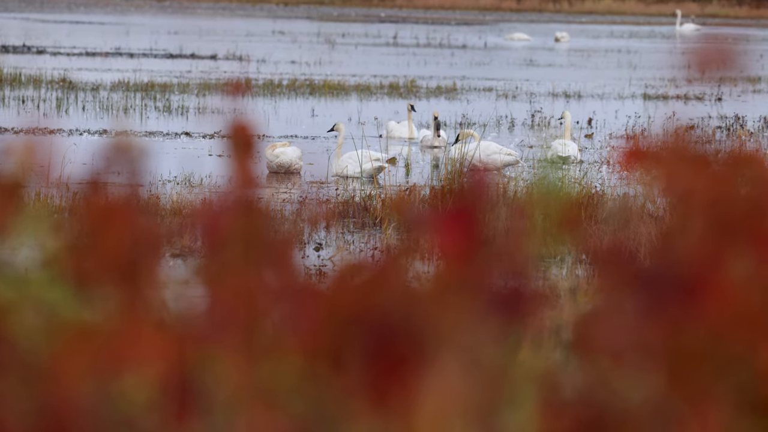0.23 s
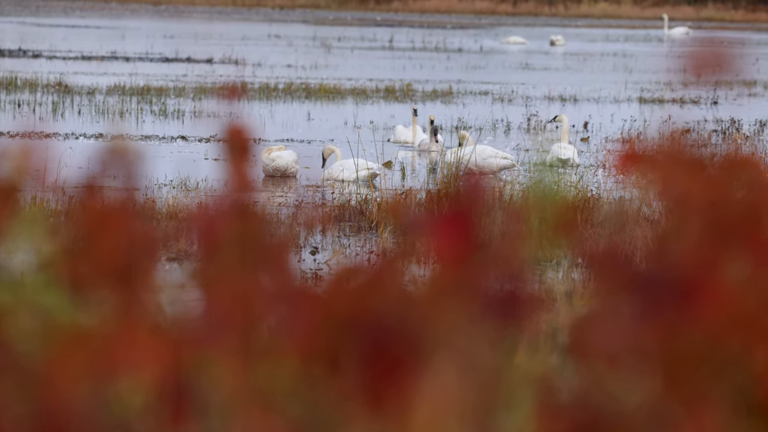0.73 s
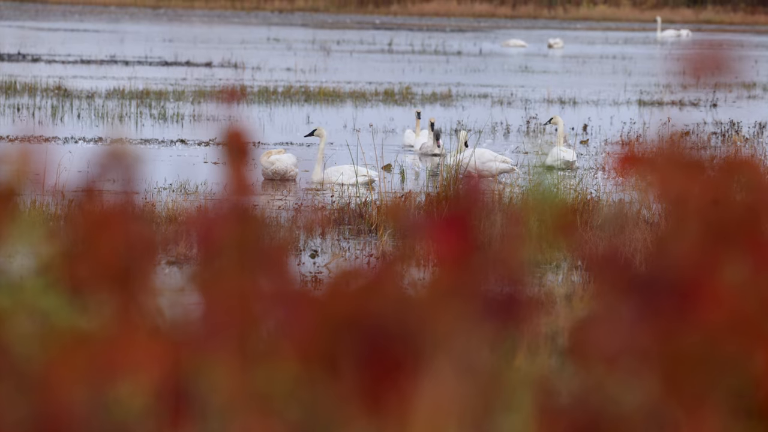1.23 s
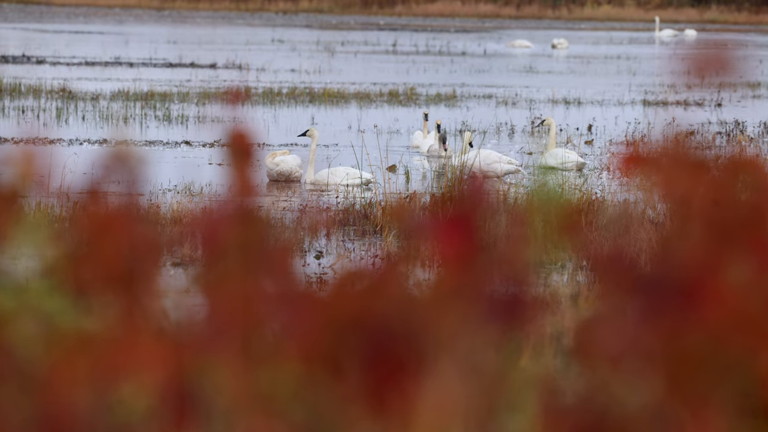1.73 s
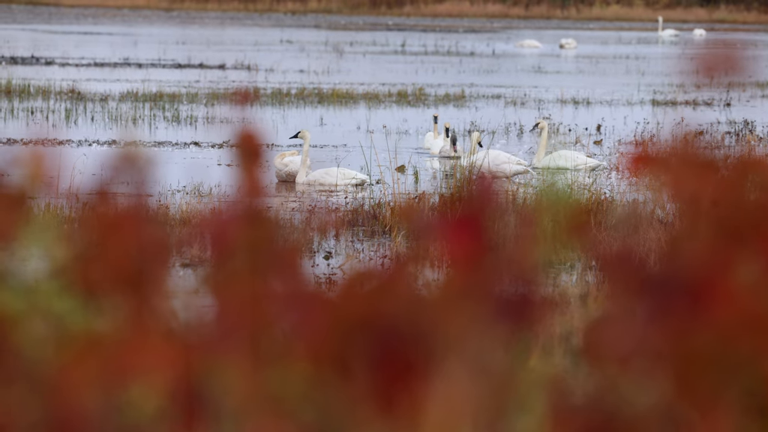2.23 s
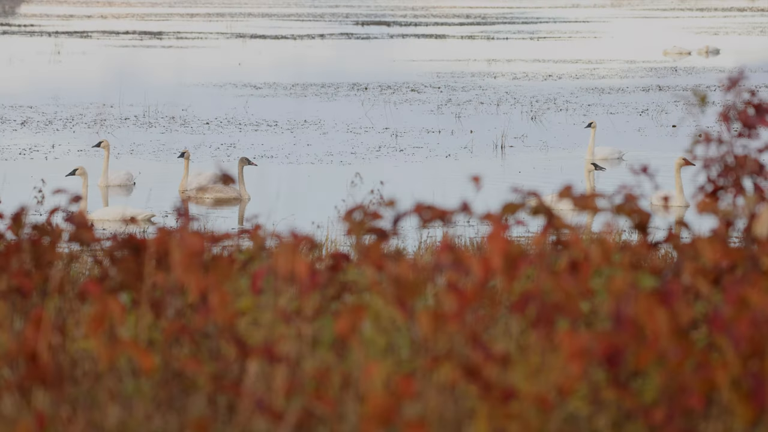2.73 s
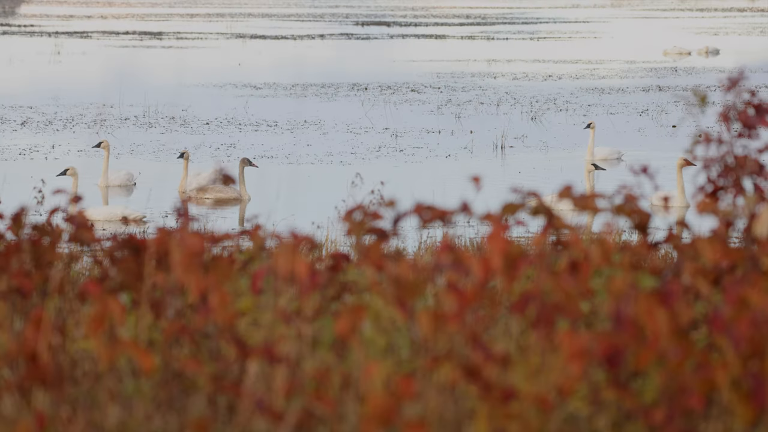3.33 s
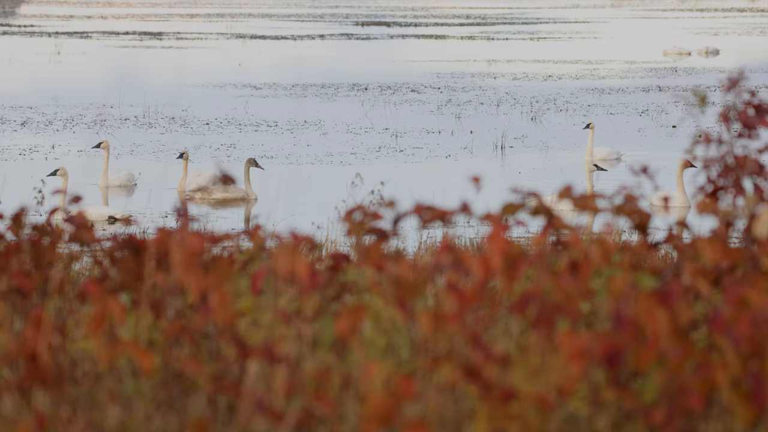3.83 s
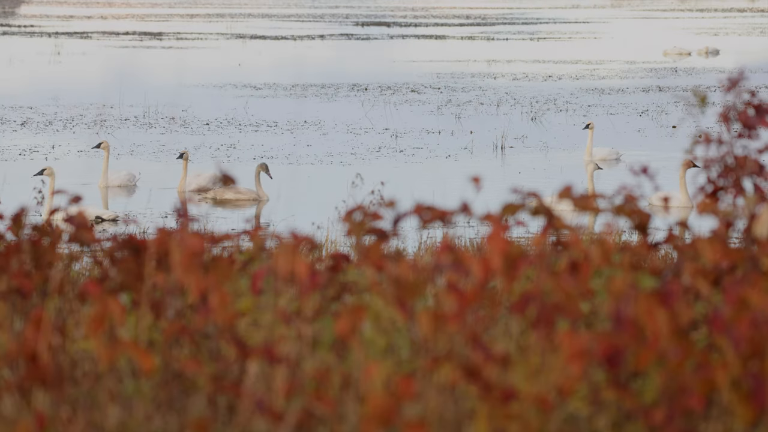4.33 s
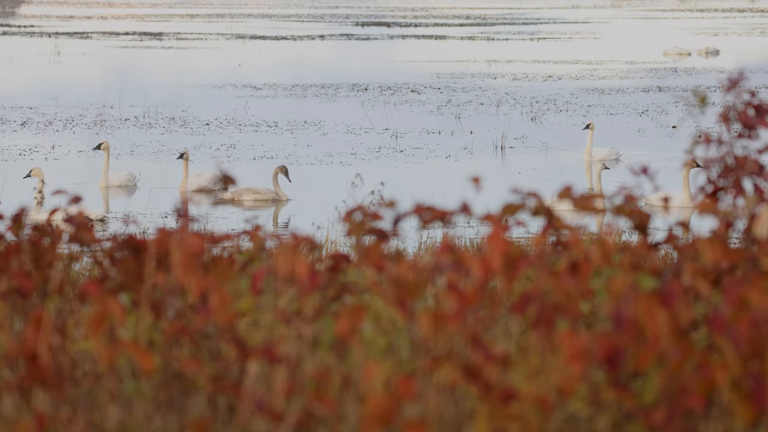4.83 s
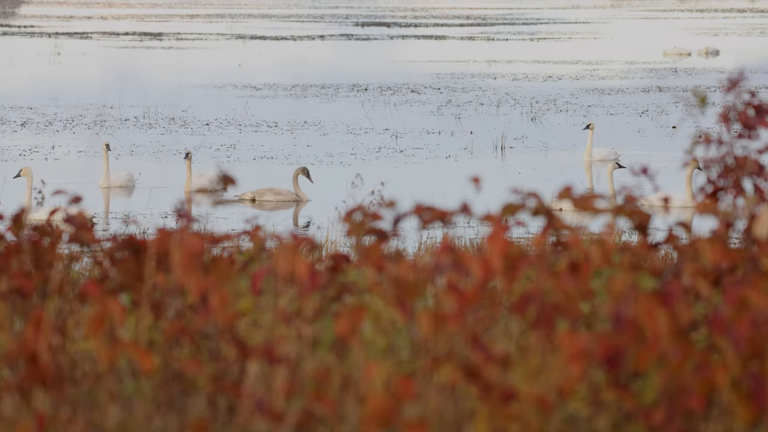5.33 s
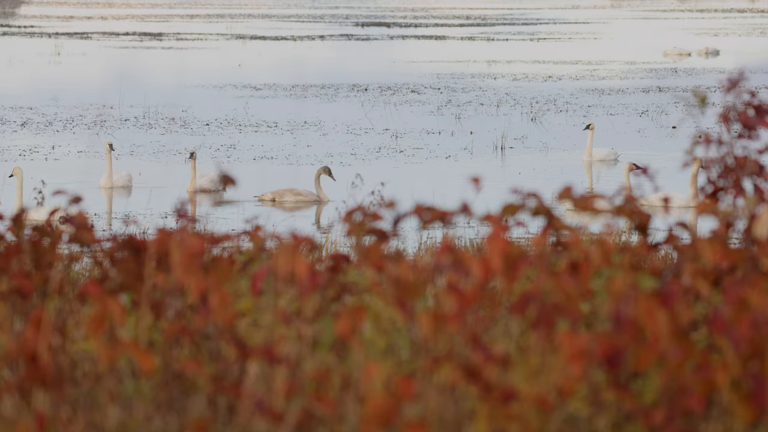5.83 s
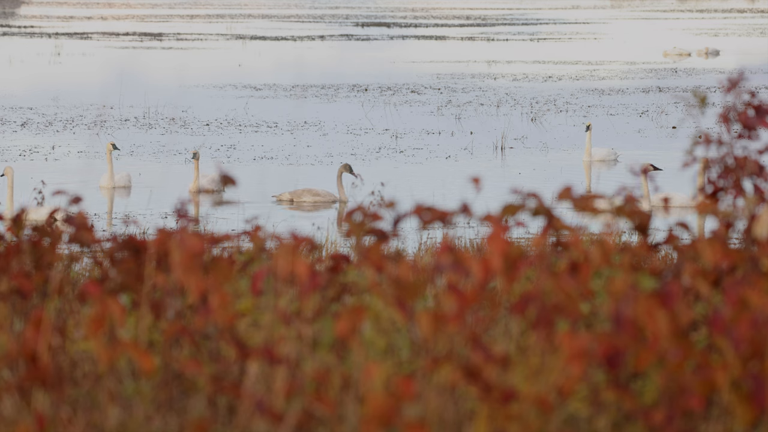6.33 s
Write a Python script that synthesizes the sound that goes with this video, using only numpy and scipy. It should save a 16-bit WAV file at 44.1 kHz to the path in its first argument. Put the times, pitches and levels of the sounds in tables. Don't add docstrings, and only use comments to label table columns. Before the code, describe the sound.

Distant swans hoot and bugle over a marshy pond, sparse at first amid low wind buffeting, later overlapping loudly with faint shore echoes.

```python
import sys
import numpy as np
from scipy import signal
from scipy.fft import rfft, irfft, next_fast_len
from scipy.io import wavfile
from scipy.ndimage import uniform_filter1d, map_coordinates

SR = 44100
rng = np.random.default_rng(int(sys.argv[2]) if len(sys.argv) > 2 else 0)


def voltage_ratio(level):
    return 10 ** (np.asarray(level, float) / 20)


def file_out(sig):
    cols = np.atleast_2d(sig).T
    lim = np.clip(cols, -1, 1)
    pcm = np.round(lim * 32767).astype(np.int16)
    wavfile.write(sys.argv[1], SR, pcm)


N = 290178
TIME = np.arange(N) / SR
CHANGE_S = 2.447

# (frequency [Hz], likeness [0-1])
FIRST_ALIKE = [(60, 1), (130, 0.9), (290, 0.97), (640, 0.99), (1410, 1), (3100, 0.93), (6820, 0.66),
               (15000, 0.18)]


def unit(x):
    return x / np.sqrt(np.mean(x ** 2) + 1e-20)


def along(points, hz):
    f, v = np.transpose(points)
    return np.interp(np.log(hz + 1), np.log(f + 1), v)


def wobble(rate, size):
    knots = rng.standard_normal(max(int(size * rate / SR) + 4, 200))
    return map_coordinates(knots, [np.arange(size) * rate / SR])


def filtered(x, response):
    m = next_fast_len(x.shape[-1] + 8192)
    spectrum = rfft(x, m) * response(np.fft.rfftfreq(m, 1 / SR))
    return irfft(spectrum, m)[..., :x.shape[-1]]


def rush(spectrum, alike, patchy_db):
    z = signal.stft(rng.standard_normal((2, N)), nperseg=512)[2]
    field = uniform_filter1d(rng.standard_normal(z.shape[1:]), 6, 0)
    field = unit(uniform_filter1d(field, 14, 1))
    pair = signal.istft(z * voltage_ratio(patchy_db * field), nperseg=512)[1][:, :N]

    def mid_and_side(hz):
        angle = np.arccos(np.clip(along(alike, hz), -1, 1)) / 2
        return voltage_ratio(along(spectrum, hz)) * [np.cos(angle), np.sin(angle)]

    mid, side = filtered(pair, mid_and_side)
    return unit(np.array([mid + side, mid - side]))


def wind():
    # (time [s], level [dB])
    buffet = [
        (0.0, -56),
        (0.13, -48),
        (2.13, -47.5),
        (2.45, -49.5),
    ]
    # (frequency [Hz], density [dB per Hz])
    gust = [(12, -48), (20, -4.5), (76, 0), (130, -12.5), (190, -37.5), (239, -21), (350, -33.5),
            (460, -83), (770, -120)]
    lumps = voltage_ratio(2.5 * wobble(22.01, N))
    level_db = np.interp(TIME, *np.transpose(buffet))
    return voltage_ratio(level_db) * unit(lumps * rush(gust, FIRST_ALIKE, patchy_db=-2.0))


def first_marsh():
    # (frequency [Hz], density [dB per Hz])
    first_colour = [(88, -73), (150, -7), (244, -6.5), (347, -7), (397, 1), (610, -11), (686, -4),
                    (801, -11.5), (993, -5), (1230, -15.5), (1650, -15), (2040, -18.5), (3590, -18.5),
                    (5200, -24), (15800, -26.5)]
    level_db = -53 + 0.8 * wobble(5, N)
    return voltage_ratio(level_db) * rush(first_colour, FIRST_ALIKE, patchy_db=1.0)


def twigs():
    # (time [s], peak level [dB], ring frequency [Hz])
    ticks = [(0.13, -47, 1660), (0.254, -46, 1730), (0.7018, -41.5, 4100), (0.8619, -43, 2100),
             (1.143, -50.5, 3210), (1.2321, -41, 3400), (1.3144, -34, 3930), (1.671, -48.5, 3200),
             (1.719, -49.5, 2940), (1.898, -46.5, 3040), (2.097, -48, 1630), (2.37, -29, 1460),
             (3.5067, -42, 1800), (4.247, -48, 5270)]
    out, t = np.zeros(N), np.arange(900) / SR
    for s, db, hz in ticks:
        snap = np.sin(2 * np.pi * 4200 * t) * voltage_ratio(-60 * t / 0.0009)
        ring = np.sin(2 * np.pi * hz * t) * voltage_ratio(-60 * t / 0.0022)
        wisp = 0.14 * rng.standard_normal(len(t)) * voltage_ratio(-60 * t / 0.012)
        out[round((s + 0.0012) * SR):][:len(t)] += voltage_ratio(db + 9.5) * (snap + 0.9 * ring + wisp)
    return filtered(out, lambda f: 1 / (1 + (f / 6500) ** 6) / (1 + (1000 / (f + 1)) ** 4))


def breath(t, length, change_db, manner):
    attack, release, dome_db, crest, arch, scoop, sag, dull, dying_db = manner
    broken_share = 0.41
    off_crest = (2 * (t / length - crest)) ** 2
    opening = np.clip(1 - t / attack, 0, 1)
    closing = np.clip(1 - (length - t) / release, 0, 1)
    broken = np.clip(closing * release / 0.022, 0, 1) ** 0.92
    pitch_share = 1 - arch * off_crest - scoop * np.exp(-t / 0.012) - sag * broken
    dying = broken_share * broken + (1 - broken_share) * closing ** 2
    db = change_db * (t / length - 0.5) - dome_db * off_crest - 16 * opening + dying_db * dying
    bright_db = -7 * opening - 4 * broken - dull * off_crest
    return [uniform_filter1d(c, size=300, mode="nearest") for c in (pitch_share, db, bright_db)]


def overtones(pitch_hz, voice, bright_db, lag):
    numbers = [1, 2, 3, 4, 5, 6, 7, 8, 9, 10, 12, 15, 20, 28]
    k = np.arange(1, 37)[:, None]
    last = numbers[len(voice) - 1]
    level_db = np.interp(k, numbers[:len(voice)], voice)
    level_db = level_db - 34 * np.log2(np.maximum(k / last, 1))
    level_db = level_db + bright_db * np.log2(np.maximum(k / 2, 1))
    drift = rng.uniform(0, 2 * np.pi) + 1.5 * wobble(14, len(pitch_hz))
    ripple = np.cos(2 * np.pi * k * pitch_hz / 1900 + drift)
    level_db = level_db + 5 * np.clip((k - 3) / 8, 0, 1) * ripple
    phase = 2 * np.pi * np.cumsum(pitch_hz) / SR
    waves = np.cos(k * phase + lag * np.log(np.minimum(k, 5)))
    return -np.sqrt(2) * np.sum(voltage_ratio(level_db) * (k * pitch_hz < 16500) * waves, axis=0)


def honks():
    # (time [s], length [s], top pitch [Hz], second overtone's level [dB], level change over the honk [dB])
    warbler = [
        (1.484, .098, 408.2, -25, -4),
    ]
    hooter = [
        (0.743, 0.1, 413.4, -26.5, -5),
        (6.107, 0.097, 428.6, -26, -2),
    ]
    murmur = [
        (5.144, 0.275, 294.1, -37, 0),
    ]
    far = [
        (2.615, .105, 439, -53.5, 2),
        (3.623, 0.12, 353.7, -43.5, 0),
        (5.34, 0.17, 457, -32, 23.5),
    ]
    undertone = [
        (5.427, 0.087, 206.5, -40.5, -5),
    ]
    hidden = [
        (5.43, 0.2, 414.3, -27, -3.5),
    ]
    leader = [
        (2.862, 0.13, 465.5, -16.5, -2.8),
        (5.44, 0.16, 467.7, -13, 3),
    ]
    mate = [
        (5.706, 0.12, 432.6, -19, -5),
    ]
    elder = [
        (3.078, .142, 428.3, -16.5, -3),
    ]
    bugler = [
        (6.185, 0.13, 457, -15, -2.4),
    ]
    bass = [
        (2.649, 0.094, 314.4, -41.5, 2.5),
        (6.388, 0.089, 321, -26.5, -2.5),
    ]
    baritone = [
        (3.117, 0.18, 314.8, -27, 2),
    ]
    chum = [
        (2.89, .115, 437.3, -21, 1.6),
    ]
    yelps = [
        (2.758, .033, 384, -49.5, -0.5),
        (3.381, 0.031, 392, -36.5, -8),
        (5.855, 0.046, 399, -39.5, -13),
        (6.376, 0.05, 410, -30.5, -5),
    ]
    birds = [warbler, hooter, murmur, far, undertone, hidden, leader, mate,
             elder, bugler, bass, baritone, chum, yelps]
    # (overtone level [dB]), one per overtone number
    soft_voices = [
        (-20.5, -1, -20, -21.5, -23.5, -26.5, -31, -54, -34, -38, -51, -62),
        (-21.5, 2.5, -16.5, -20.5, -27, -22.5, -26.5, -27.5, -22.5, -32, -42.5, -60.5),
        (-15.5, 2, 0, -7, -18, -20.5, -18, -21.5, -16.5, -25.5, -34.5, -49.5),
        (-22, 1, -17, -23.5, -27, -28),
        (-12.5, -19, 3.5, -26.5, -16.5, -34, -17.5),
        (-13, 0, -17, -17.5, -16, -19, -19.5),
    ]
    # (overtone level [dB]), one per overtone number
    full_voices = [
        (-19, 0, -11, -11, -10.5, -18.5, -16.5, -23, -31, -39, -40, -46.5, -53, -64.5),
        (-13.5, -1.5, -7, -10.5, -8, -14.5, -14, -12.5, -14.5, -22.5, -23.5, -32.5, -59, -59),
        (-17, -0.5, -5, -11.5, -11.5, -14.5, -18.5, -26, -29, -33, -42, -52, -58.5),
        (-12.5, 0, -7.5, -16, -11, -11, -22, -32.5, -33, -42, -53, -51.5, -78),
        (-10.5, 3, 0.5, -8.5, -10.5, -19, -23.5, -24, -28, -34.5, -36.5, -48.5),
        (-11, 1, -5.5, -13.5, -18, -18.5, -23, -29, -22, -21, -20.5, -36, -46),
        (-15, -0.5, -5.5, -15, -7, -8, -14, -22, -22, -22, -27, -32.5, -50.5, -48),
        (-20.5, 0.5, -13.5, -21, -27, -25.5),
    ]
    # (attack [s], release [s], dome of level [dB], crest [share of length],
    # arch of pitch, scoop at the start, sag at the end [shares of pitch])
    manners = [(0.011, 0.037, -3.5, 0.42, 0.054, 0.008, 0.076),
               (0.013, 0.044, -2.5, .4, 0.039, 0.0072, 0.064), (0.013, .035, 1, .45, 0.024, 0.013, 0.054),
               (.012, 0.022, 5, 0.35, .02, .01, 0.093), (0.028, 0.038, -12, 0.32, 0.0073, .005, 0.011),
               (0.0041, 0.04, 3.5, 0.35, 0.042, 0.003, .07), (0.013, 0.022, 7.5, .55, .035, 0.017, 0.071),
               (0.0098, 0.026, 5.5, .45, 0.03, .035, .1), (0.023, 0.0325, 1.5, 0.43, 0.033, 0.0574, 0.14),
               (0.012, 0.025, 5.5, 0.37, 0.034, 0.025, .11), (0.012, 0.029, 5.5, 0.35, 0.032, .005, 0.06),
               (0.019, 0.038, 1, .55, 0.0586, 0.015, 0.085),
               (0.0078, 0.039, 6.5, 0.458, 0.02, 0.024, 0.059), (0.0084, 0.022, 2, 0.23, .03, 0.0092, .06)]
    dulling = [1.2, 1.6, 1.2, 1.2, 1.2, 1.2, 0.71, 5.9, 2.1, 1.8, 1.6, 1.2, 1.2, 1.2]
    dying = [-14, -14, -12, -11, -13.5, -12, -12.5, -8, -11, -13, -16, -12.5, -11.5, -12]
    roughness = [0.25, 0.13, 0.46, .5, .5, 1.2, 1, .8, 2.4, 0.75, 0.57, 0.52, 0.73, .6]

    out = np.zeros(N + SR)
    flock = zip(birds, soft_voices + full_voices, manners, dulling, dying, roughness)
    for rows, voice, shape, dull, dying_db, rough in flock:
        for s, length, top_hz, top_db, change_db in rows:
            t = np.arange(round(length * SR)) / SR
            share, db, bright_db = breath(t, length, change_db, (*shape, dull, dying_db))
            hoarse = rough * np.exp(-t / 0.021)
            unsteady = 0.0012 * wobble(60, len(t)) + 0.038 * hoarse * wobble(250, len(t))
            pitch_hz = top_hz * share * (1 + unsteady)
            if rows is warbler:
                throb = np.cos(2 * np.pi * 66.5 * (t + s - 1.495))
                pitch_hz = pitch_hz * (1 + 0.028 * throb)
                db, bright_db = db + 2.2 * throb, bright_db + 2.2 * throb
            tone = overtones(pitch_hz, voice, bright_db, lag=1.2)
            rasp = 1 + (0.035 + 0.18 * hoarse) * wobble(500, len(t))
            ends = np.minimum(1, np.minimum(t, t[-1] - t) / 0.0048)
            level = voltage_ratio(top_db + db + 0.7 * wobble(50, len(t)))
            out[round(s * SR):][:len(t)] += level * ends * rasp * tone
    return out[:N]


def bursts():
    # (first burst [s], last burst [s], first level [dB], last level [dB])
    runs = [
        (.753, .753, -29, -36.5),
        (2.842, 2.842, -44, -42),
        (2.861, 2.891, -29.5, -28.5),
        (3.052, 3.092, -27.5, -19.5),
        (5.39, 5.447, -38, -33),
        (5.689, 5.71, -21.5, -27),
        (6.154, 6.184, -25, -22),
        (6.381, 6.381, -42, -38),
    ]
    gap_s, scatter_db = 0.01, 4.2
    timid_db, yield_db = -3, -2
    rows = []
    for first, last, first_db, last_db in runs:
        luck = rng.standard_normal(12)
        count = round((last - first) / gap_s) + 1
        for u, z in zip(np.linspace(1, 0, count)[::-1], luck):
            def between(start, end):
                return start + u * (end - start)

            s = first + (last - first) * u ** 0.9
            db = between(first_db, last_db) + scatter_db * z + yield_db * (u == 1) + timid_db * (u == 0)
            rows.append((s, between(301, 401), db, between(0.015, 0.0071), between(-4.5, 2.5)))
    return rows


def resonances(modes):
    def response(f):
        return sum((-1) ** k * voltage_ratio(db) * 1j * f * w / (c * c - f * f + 1j * f * w)
                   for k, (c, w, db) in enumerate(modes))
    return response


def stutter():
    # (frequency [Hz], width [Hz], level [dB])
    pipe = [
        (288, 20, -8.5),
        (693, 120, 6),
        (890, 138, 4),
        (1210, 98, -3),
        (1850, 1960, -13),
        (2730, 1010, -11),
        (3670, 370, -22),
    ]
    out, k = np.zeros(N), np.arange(1, 19)[:, None]
    for s, hz, db, length, bright_db in bursts():
        t = np.arange(round(0.02 * SR)) / SR - 0.001
        gate = np.clip((t + 0.003) / 0.00037, 0, 1) * np.clip((0.7 * length - t) / 0.0034, 0, 1)
        levels = voltage_ratio(bright_db * np.log2(k) - (k * hz / 1400) ** 2)
        closures = np.sum(levels * np.cos(2 * np.pi * k * hz * (t + 3 * t * t)), axis=0)
        out[round((s - 0.001) * SR):][:len(t)] -= voltage_ratio(db + 3.0) * gate * closures
    return filtered(out, resonances(pipe))


def shore(x):
    # (level [dB], time to fall 60 dB [s])
    scatter = [
        (-32, 0.71),
        (-40, 6.6),
    ]
    # (delay [s], level [dB])
    clear = [
        (.1, -27),
        (.165, -31),
        (.3, -35),
        (.47, -36.5),
    ]
    # (frequency [Hz], level [dB])
    reeds = [(200, -24.5), (900, 0), (1500, -9.5), (3000, -3.5), (8000, 6.5)]
    t = np.arange(round(1.2 * SR)) / SR
    decay = sum(voltage_ratio(db - 60 * t / t60) for db, t60 in scatter)
    tail = rng.standard_normal(len(t)) * decay * np.clip((1.2 - t) / 0.47, 0, 1) / np.sqrt(0.063 * SR)
    for delay, db in clear:
        tail[round(delay * SR)] += voltage_ratio(db)
    return signal.fftconvolve(x, filtered(tail, lambda hz: voltage_ratio(along(reeds, hz))))[:N]


def thumps():
    # (time [s], frequency [Hz], level [dB])
    knocks = [
        (1.249, 87, -26.5),
        (1.273, 108, -32.5),
        (1.305, 99, -33.5),
        (1.406, 87, -28.5),
        (1.598, 92, -25),
        (2.073, 81, -27.5),
        (2.11, 83.6, -32),
        (2.315, 94, -45),
    ]
    out, t = np.zeros(N), np.arange(SR // 10) / SR
    for s, hz, db in knocks:
        swing = np.cos(2 * np.pi * hz * t) * np.clip(t / 0.0034, 0, 1)
        out[round(s * SR):][:len(t)] -= voltage_ratio(db - 60 * t / 0.087) * swing
    return out


def second_marsh():
    # (frequency [Hz], density [dB per Hz])
    second_colour = [(12, -47), (20, -2.5), (123, -5), (158, -10), (240, -2), (375, -4.5), (419, -1.5),
                     (482, -11), (996, -10.5), (1250, -14.5), (1560, -21), (1690, -18), (2240, -22.5),
                     (6290, -26), (15800, -27)]
    # (frequency [Hz], likeness [0-1])
    second_alike = [(60, 0.24), (130, 0.81), (290, 0.99), (640, 0.98), (1410, 1), (3100, 0.81),
                    (6820, 0.62), (15000, 0.41)]
    fade_in = np.clip(TIME - CHANGE_S, 0, 1) ** 0.77
    level_db = -49.5 + np.maximum(TIME - 4.7, 0)
    return fade_in * voltage_ratio(level_db) * rush(second_colour, second_alike, patchy_db=0.94)


def wheeze():
    # (start [s], end [s], centre [Hz], width [Hz], level [dB])
    leaks = [
        (5.085, 5.16, 2700, 250, -61),
        (6.35, 6.46, 3300, 800, -55),
    ]
    out = np.zeros(N)
    for start, end, hz, width, db in leaks:
        swell = np.sin(np.pi * np.clip((TIME - start) / (end - start), 0, 1)) * voltage_ratio(2.6 * wobble(67.0, N))
        hiss = filtered(rng.standard_normal(N), lambda f: np.exp(-((f - hz) / width) ** 2))
        out += voltage_ratio(db) * swell * unit(hiss)
    return out


def scene():
    birds = honks() + stutter()
    flutter = voltage_ratio(3.5 * wobble(60, N))
    answer = shore(birds) * np.where(TIME < CHANGE_S, voltage_ratio(-8), 1) * flutter
    closing = np.clip((CHANGE_S - TIME) / 0.00089, 0, 1)
    bank = (wind() + first_marsh()) * closing + second_marsh()
    return birds + answer + wheeze() + twigs() + thumps() + bank


def low_pass(x):
    return signal.sosfilt(signal.butter(12, 17080, fs=SR, output="sos"), x)


def record(dry):
    mix = filtered(dry, lambda hz: hz < 15790)
    return low_pass(mix)


dry = scene()
out = record(dry)
file_out(out)
```